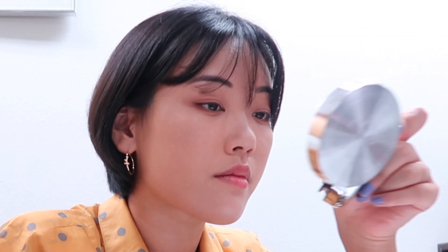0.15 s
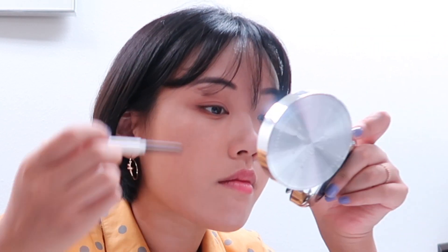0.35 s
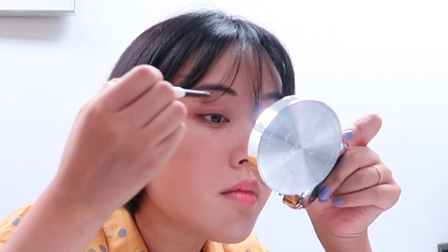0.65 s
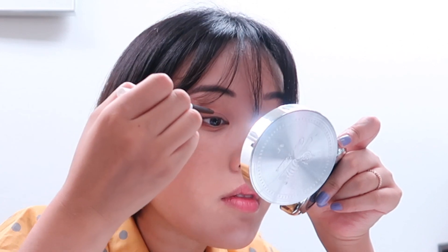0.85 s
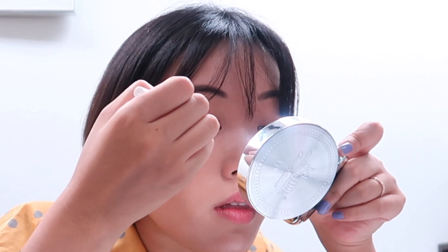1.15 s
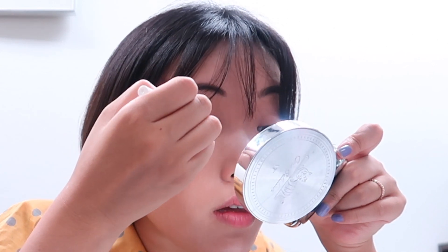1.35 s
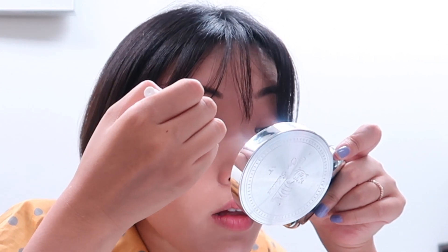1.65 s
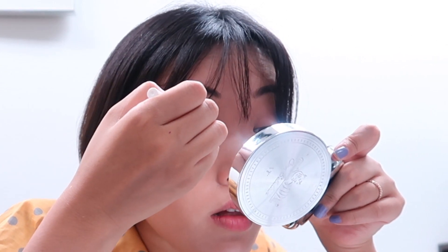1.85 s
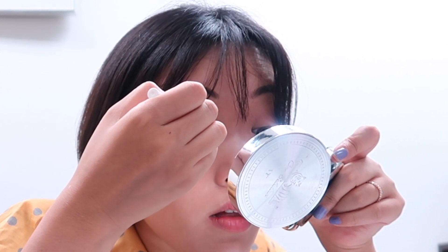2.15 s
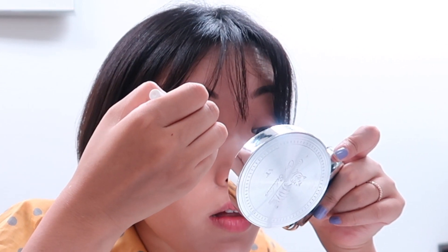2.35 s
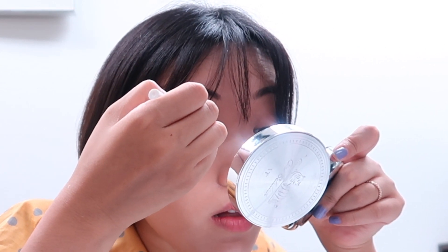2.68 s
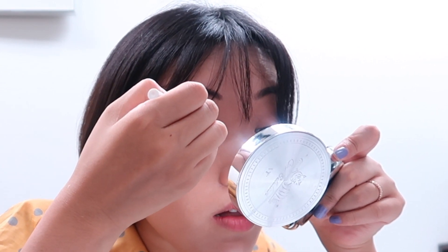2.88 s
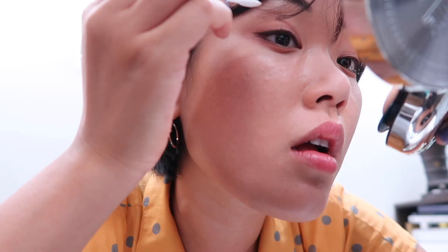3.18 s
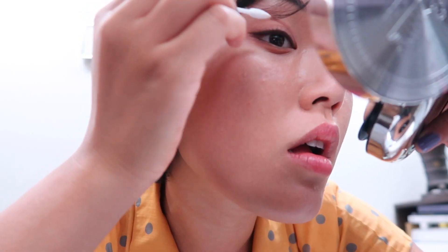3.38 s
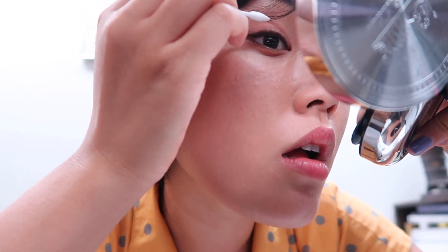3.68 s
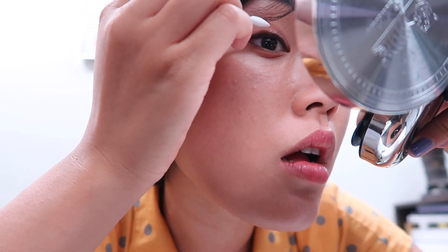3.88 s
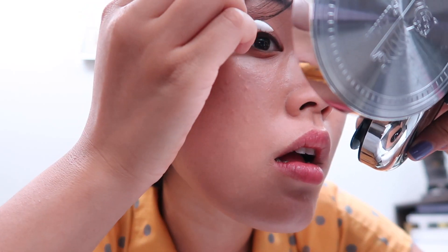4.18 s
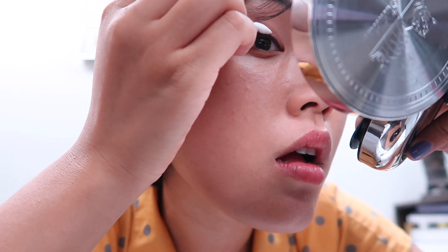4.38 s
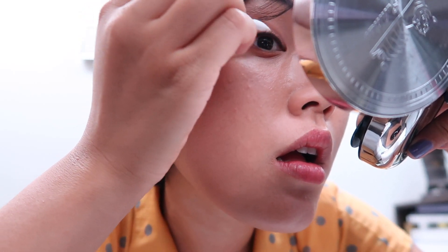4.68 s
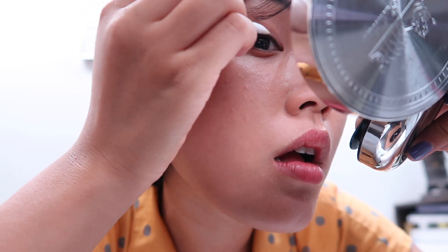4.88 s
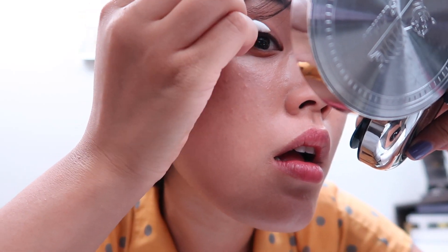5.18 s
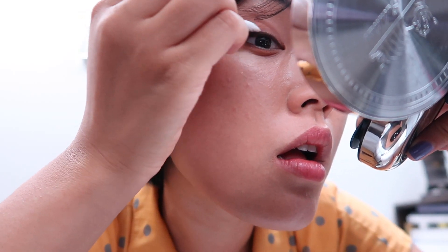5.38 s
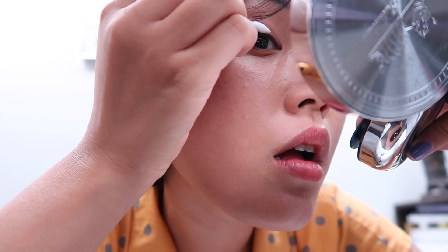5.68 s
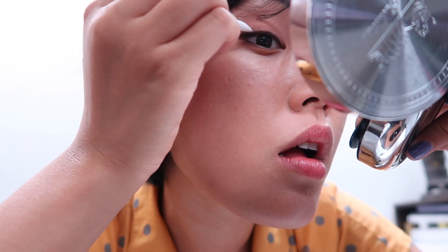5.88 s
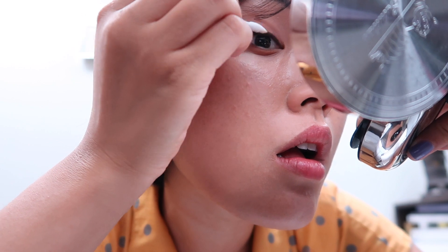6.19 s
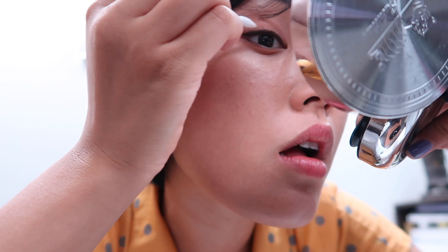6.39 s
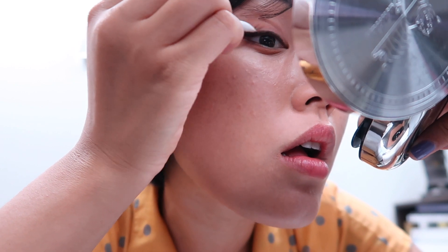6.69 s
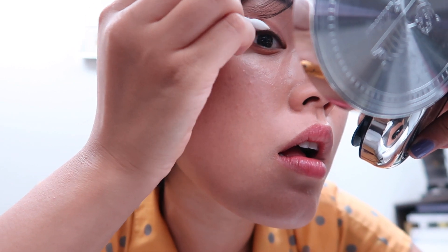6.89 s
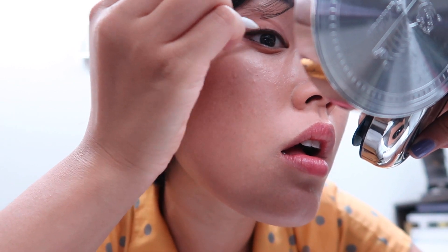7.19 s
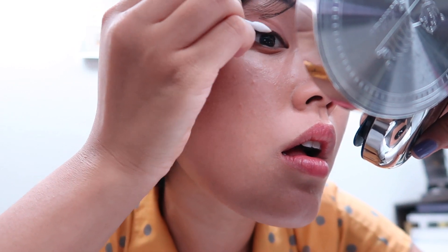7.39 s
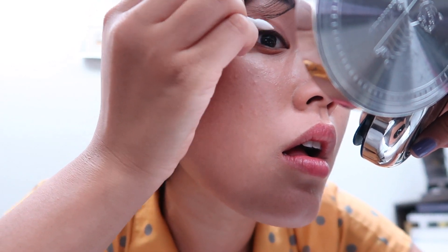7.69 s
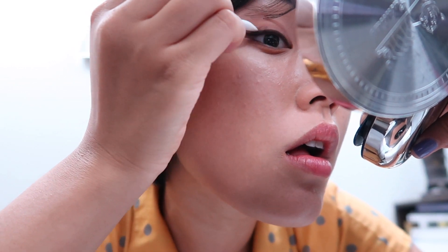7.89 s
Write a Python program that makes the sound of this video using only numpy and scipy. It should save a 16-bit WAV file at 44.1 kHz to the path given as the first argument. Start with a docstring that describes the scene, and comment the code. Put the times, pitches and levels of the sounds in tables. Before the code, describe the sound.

Close stereo microphone in a small, fairly dry room. A low, uneven air-conditioner hum runs throughout. It opens with a brief grainy scuff that dies fast. Faint rubs follow around one second, then a hard object is put down with a loud clack-clack and low furniture thump near 2.7 seconds, trailed by small taps and a rub. Afterwards only hum and very faint rapid ticking remain, until a tiny tap at the end.

```python
"""A hard object is put down: rough cracks set object and room ringing (clack-clack), furniture modes thump.
Before it, a grainy noise slide scuffs across the room.
Close by, someone does make-up: band-noise clinks and rubs, and a tiny motor ticking with snaps and short rings.
Behind all this an air conditioner hums: shaped noise, mains tones and an uneven low drone, with air and whines."""
import sys
import numpy as np
from scipy import signal
from scipy.fft import rfft, irfft, next_fast_len
from scipy.io import wavfile
from scipy.ndimage import uniform_filter1d, map_coordinates

SR = 44100
rng = np.random.default_rng(int(sys.argv[2]) if len(sys.argv) > 2 else 0)


def file_out(sig):
    """Save sig as 16-bit WAV at sys.argv[1]."""
    # one column per channel
    cols = np.atleast_2d(sig).T
    # limit, then scale
    lim = np.clip(cols, -1, 1)
    pcm = np.round(lim * 32767).astype(np.int16)
    wavfile.write(sys.argv[1], SR, pcm)


N = 354986


def amp(db):
    """Decibels to gain."""
    return 10 ** (np.asarray(db) / 20)


def unit(x):
    """Scale to rms 1."""
    return x / np.sqrt(np.mean(x ** 2) + 1e-20)


def along(points, hz):
    """(Hz, value) points read on a log-frequency axis."""
    f, v = np.transpose(points)
    return np.interp(np.log(hz + 1), np.log(f + 1), v)


def curve(rows):
    """(s, value) rows as one value per sample."""
    return np.interp(np.arange(N) / SR, *np.transpose(rows))


def wobble(rate_hz):
    """Smooth random curve, rate_hz knots a second."""
    knots = rng.standard_normal(int(N * rate_hz / SR) + 4)
    return map_coordinates(knots, [np.arange(N) * rate_hz / SR])


def attack(t, rise_s):
    """Exponential approach to 1."""
    return 1 - np.exp(-t / rise_s)


def decay(t, t60_s):
    """Exponential decay, 60 dB in t60_s."""
    return np.exp(-np.log(1000) * t / t60_s)


def bell(hz, centre_hz, width_hz):
    """Gaussian weight of a narrow resonance."""
    return np.exp(-2 * ((hz - centre_hz) / width_hz) ** 2)


def octave_bell(hz, pitch_hz, octaves):
    """Gaussian weight on a log-frequency axis."""
    return np.exp(-.5 * (np.log2((hz + 1) / pitch_hz) / octaves) ** 2)


def filtered(x, response):
    """x through a response given as a function of frequency."""
    n = x.shape[-1]
    m = next_fast_len(n + SR // 2)
    return irfft(rfft(x, m) * response(np.fft.rfftfreq(m, 1 / SR)), m)[..., :n]


def noise(response):
    """Noise whose amplitude per root Hz follows the response."""
    return filtered(rng.standard_normal(N) * np.sqrt(SR / 2), response)


def rush(spectrum):
    """Noise with a (Hz, dB per Hz) spectrum."""
    return noise(lambda hz: amp(along(spectrum, hz)))


def rippled(spectrum, ripple_db, spacing_hz):
    """Noise with random fine peaks and dips, as wall reflections give one place in a room."""
    knots = rng.standard_normal(SR // 4)

    def response(hz):
        ripple = map_coordinates(knots, [hz / spacing_hz])
        return amp(along(spectrum, hz) + ripple_db * ripple)
    return noise(response)


def ringing(modes, t, scatter_db):
    """Sum of damped modes, balanced a little differently at each blow."""
    total = 0
    for hz, db, t60_s in modes:
        gain = amp(db + rng.normal(0, scatter_db))
        total = total + gain * decay(t, t60_s) * np.sin(2 * np.pi * hz * t)
    return total


def friction(pitch_hz, octaves, rise_s, t60_s, grain_db=3):
    """One brief stroke in one noise band, grainy from uneven grip."""
    t = np.arange(SR // 2) / SR
    unevenness = uniform_filter1d(rng.standard_normal(len(t)), size=160, mode="wrap")
    grip = amp(grain_db * unit(unevenness))
    rough = grip * rng.standard_normal(len(t))
    band = filtered(rough, lambda hz: octave_bell(hz, pitch_hz, octaves))
    return unit(band) * attack(t, rise_s) * decay(t, t60_s)


def stereo(mid, side):
    """Left and right from their common and opposite parts."""
    return np.array([mid + side, mid - side])


# Stereo difference of the close microphone pair. Each row: frequency in Hz, gain of the side part in dB.
PAIR_WIDTH = [(300, -23), (1000, -20), (2000, -14), (4000, -7), (6500, 3), (9000, 6), (12000, 13)]


def widened(mid, across):
    """Two ports hear the pressure gradient across them, a quarter cycle ahead."""
    return stereo(mid, filtered(across, lambda hz: 1j * amp(along(PAIR_WIDTH, hz))))


# Room decay. Each row: frequency in Hz, t60 in s.
ROOM_DECAY = [(200, 0.35), (1000, 0.25), (4000, 0.27), (12000, 0.3)]


def in_room(sound, wet_db):
    """Direct sound plus a fresh diffuse noise tail, at both microphones."""
    hz, t, z = signal.stft(rng.standard_normal((2, SR // 2)), SR, nperseg=256)
    fall = amp(-60 * t / along(ROOM_DECAY, hz)[:, None])
    tails = signal.istft(z * fall, SR, nperseg=256)[1]
    answer = amp(wet_db) * tails / np.linalg.norm(tails[0])
    answer[:, 0] += 1  # direct sound
    return widened(*signal.fftconvolve(sound[None], answer, axes=1))


def add(track, s, sound):
    """Mix a sound into the track at time s."""
    part = track[..., max(round(s * SR), 0):][..., :sound.shape[-1]]
    part += sound[..., :part.shape[-1]]


# Level curve of the low drone, uneven by chance. Each row: time in s, level in dB before trim and flutter.
DRONE_CURVE = [(0.0, -37), (0.06, -29.5), (0.18, -43.0), (0.24, -33.0), (0.35, -28.5), (0.48, -45),
               (0.65, -29.5), (0.78, -37), (1.03, -28.5), (1.16, -41), (1.23, -29.5), (1.44, -56),
               (1.49, -32.5), (1.59, -28.5), (1.7, -35.5), (1.77, -55), (1.85, -41), (1.96, -29.5),
               (2.13, -40), (2.21, -28.5), (2.36, -38), (2.41, -29), (2.49, -33), (2.58, -38), (2.67, -26),
               (2.75, -25), (2.84, -39), (2.92, -25.5), (3.08, -45), (3.15, -28), (3.24, -36), (3.3, -29.5),
               (3.62, -39.5), (3.86, -36), (3.93, -30), (4.1, -36), (4.16, -50), (4.22, -35), (4.3, -58),
               (4.42, -35.5), (4.47, -47), (4.56, -22.5), (4.64, -51), (4.68, -40), (4.86, -29.5),
               (4.96, -39), (5.02, -29.5), (5.13, -37.5), (5.23, -29), (5.47, -42), (5.54, -29),
               (5.6, -45.5), (5.64, -29.5), (5.7, -48), (5.77, -31), (5.83, -51), (5.89, -31.5),
               (5.99, -29), (6.09, -44), (6.16, -34.5), (6.22, -35.5), (6.29, -31), (6.48, -32),
               (6.54, -36), (6.75, -30), (6.97, -43), (7.22, -35), (7.5, -35), (7.61, -27), (7.78, -52),
               (7.93, -40), (8.04, -31)]


def fan(pitch_hz=117.2, wander_hz=3.6, trim_db=-4.2, flutter_db=1.5):
    """A low sine drone follows an uneven level curve while its pitch wanders."""
    phase = 2 * np.pi * np.cumsum(pitch_hz + wander_hz * wobble(14)) / SR
    level_db = curve(DRONE_CURVE) + trim_db + flutter_db * wobble(15)
    return amp(level_db) * np.sqrt(2) * np.sin(phase)


# Machine rumble. Each row: frequency in Hz, density in dB per Hz.
RUMBLE_SPECTRUM = [(6, -88), (18, -57.5), (45, -61), (100, -60.5), (150, -60.5), (195, -64.5), (225, -70),
                   (262, -83.5), (340, -100), (600, -125)]
# Narrow noise drones of fan and room. Each row: centre in Hz, width in Hz, peak density in dB per Hz.
DRONE_BANDS = [(25.4, 3.3, -53.5), (32.7, 5.2, -50.5), (64, 16, -59.5), (111.3, 8.5, -58),
               (171.8, 2.5, -55.5), (188.5, 10, -59.5), (230.3, 5.6, -67), (330.7, 3.8, -72)]
# Mains hum. Each row: frequency in Hz, rms level in dB about which it wavers.
MAINS_HUM = [(120, -48.5), (240, -58.5)]


def air_conditioner(waver_db=0.5, drift_rad=0.27):
    """Rumble, narrow drones, and the fan's uneven drone just under the mains hum."""
    t = np.arange(N) / SR
    drones = noise(lambda hz: sum(amp(db) * bell(hz, centre, width) for centre, width, db in DRONE_BANDS))
    hum = 0
    for hz, db in MAINS_HUM:
        level = amp(db + waver_db * wobble(2.6))
        hum = hum + level * np.sqrt(2) * np.sin(2 * np.pi * hz * t + drift_rad * wobble(2.196))
    return rush(RUMBLE_SPECTRUM) + drones + fan() + hum


# Quick turn from one room tone to another. Each row: time in s, position from first (0) to second (1).
TONE_TURN = [(3.22, 0.08), (3.32, 1)]
# First room tone. Each row: frequency in Hz, density in dB per Hz before ripple and flutter.
FIRST_TONE = [(120, -70.5), (200, -65), (238, -62), (270, -72.5), (315, -84), (420, -79), (580, -77),
              (1050, -84), (1270, -89.5), (1550, -84.5), (2500, -93.5), (5000, -104), (11500, -116),
              (14700, -123)]
# Second room tone. Each row: frequency in Hz, density in dB per Hz before ripple and flutter.
SECOND_TONE = [(170, -100), (225, -73), (265, -82), (450, -75), (540, -77), (580, -80), (660, -79.5),
               (900, -84.5), (1200, -86.5), (1650, -85.5), (2200, -91), (3000, -97.5), (5000, -104),
               (12000, -117), (13800, -138)]
# Air that differs between the two channels. Each row: frequency in Hz, density in dB per Hz.
SIDE_AIR = [(60, -125), (130, -106), (200, -92.5), (280, -86), (450, -86.5), (520, -91.5), (1000, -93.5),
            (3500, -101), (4000, -98), (4500, -103), (7000, -109), (11000, -115), (12500, -112),
            (15000, -126)]


def air(flutter_db=0.63, ripple_db=1.37, spacing_hz=22):
    """Air noise with reflection ripple; one room tone gives way to another at equal power."""
    turn = np.clip(curve(TONE_TURN), 0, 1) * np.pi / 2
    first = np.cos(turn) * rippled(FIRST_TONE, ripple_db, spacing_hz)
    second = np.sin(turn) * rippled(SECOND_TONE, ripple_db, spacing_hz)
    return stereo((first + second) * amp(flutter_db * wobble(5.1)), rush(SIDE_AIR))


# Thin electrical tones. Each row: frequency in Hz, rms level in dB.
WHINE_TONES = [(5520, -81), (13006, -82.5)]


def whine():
    """Faint steady sines, opposite in the two channels."""
    t = np.arange(N) / SR
    tones = sum(amp(db) * np.sqrt(2) * np.sin(2 * np.pi * hz * t) for hz, db in WHINE_TONES)
    return stereo(0, tones)


# Firmer motor steps. Each row: start in s, level in dB.
FIRM_STEPS = [(0.7427, -52.5), (1.543, -51), (3.5465, -56), (3.61, -57), (3.6775, -57), (4.146, -59),
              (4.28, -57), (4.5465, -57), (4.8135, -56), (5.0805, -56), (5.347, -57), (5.6144, -56),
              (5.8805, -56), (6.1475, -56), (6.8865, -55), (7.148, -58), (7.4165, -55), (7.6825, -54)]
# Contacts within each light step. Each row: delay in s, mean level in dB.
LIGHT_CONTACTS = [(0, -65.5), (.019, -67), (.026, -69.5)]
# Motor ring. Each row: frequency in Hz, mean level in dB, t60 in s.
MOTOR_MODES = [(3560, 1.5, .018), (3980, 0, 0.022), (5260, -3.5, 0.022)]


def ticks(first_s=.0075, rate_hz=14.984, rise_s=0.00093, snap_db=0, scatter_db=3.0, uneven_db=4.0):
    """A tiny motor steps lightly and evenly, with firmer steps; each contact is a dry snap and brief ring."""
    track, t = np.zeros(N), np.arange(SR // 25) / SR
    snaps = [friction(4300, octaves=0.32, rise_s=rise_s, t60_s=0.017)[:len(t)] for _ in range(20)]
    contacts = list(FIRM_STEPS)
    for step_s in np.arange(first_s, N / SR, 1 / rate_hz):
        for delay_s, db in LIGHT_CONTACTS:
            contacts.append((step_s + delay_s, db + rng.normal(0, uneven_db)))
    for s, db in contacts:
        ring = attack(t, rise_s) * ringing(MOTOR_MODES, t, scatter_db)
        snap = amp(snap_db) * snaps[rng.integers(len(snaps))]
        add(track, s, amp(db) * (snap + ring))
    return stereo(track, 0)


# Taps of pencil and fingernails. Each row: start in s, level in dB.
CLINK_TIMES = [(2.8365, -63), (2.8545, -63), (2.9055, -58), (2.986, -71), (7.952, -63)]


def clinks():
    """Light bright taps, all in one narrow high noise band."""
    track = np.zeros((2, N))
    for s, db in CLINK_TIMES:
        tap = friction(8750, octaves=0.35, rise_s=0.0011, t60_s=0.025)
        add(track, s, amp(db) * in_room(tap, wet_db=0.0))
    return track


# Rubs of hand, mirror and sleeve.
# Each row: start in s, level in dB, pitch in Hz, width in octaves, rise in s, t60 in s.
RUB_STROKES = [(1.031, -54, 2030, 0.51, 0.097, 2), (1.17, -56.5, 3400, 0.57, 0.045, 0.5),
               (1.34, -43.5, 3930, 0.25, 0.02, 0.11), (2.903, -36, 1350, 0.62, 0.014, 0.15),
               (2.944, -46.5, 1700, .5, .004, .1), (7.972, -52.5, 6100, 0.3, 0.002, 0.22),
               (2.978, -50.5, 3820, 0.62, 0.007, 0.17), (2.985, -48.5, 800, 1.17, .03, 0.79),
               (3.079, -46, 650, .5, .003, .08), (4.47, -63, 5460, 0.46, .02, 0.33)]


def rubs():
    """Sliding contacts as grainy noise strokes, each with its own pitch and length."""
    track = np.zeros((2, N))
    for s, db, *stroke in RUB_STROKES:
        add(track, s, amp(db) * in_room(friction(*stroke), wet_db=-2.5))
    return track


# Broad colour of the slide. Each row: frequency in Hz, relative level in dB.
SLIDE_COLOUR = [(250, -33), (420, -14), (600, -6), (780, -0.5), (1130, -0.5), (1400, -3.5), (1580, -4.5),
                (1780, -4), (2200, -7.5), (2570, -5), (3000, -12), (3450, -15), (4000, -20.5), (6000, -32),
                (9000, -48), (14000, -79)]
# Room resonances heard in the scuff. Each row: centre in Hz, width in Hz, lift in dB.
ROOM_RESONANCES = [(1147, 60, 6), (1375, 40, 5.5), (1730, 60, 3), (2400, 50, 3), (2560, 60, 4),
                   (2980, 50, 7), (3200, 35, 9.5), (4730, 36, 10)]


def scuff(level_db=-26, rise_s=.0045, hold_s=0.016, grain_db=0.5):
    """From time 0, a quick push and short grainy slide, lifted at room resonances, die away, treble faster."""
    t = np.arange(N) / SR
    fall_db_per_s, treble_fall_db_per_s, dull_hz = 143, 194, 3400

    def lift(hz):
        return amp(sum(db * bell(hz, centre, width) for centre, width, db in ROOM_RESONANCES))

    def rub():
        return unit(filtered(rippled(SLIDE_COLOUR, ripple_db=1.5, spacing_hz=13), lift))
    slide = widened(rub(), rub())
    body = filtered(slide, lambda hz: 1 / (1 + (hz / dull_hz) ** 4))
    treble = slide - body
    since_s = np.maximum(t - hold_s, 0)
    fading = body * amp(-fall_db_per_s * since_s) + treble * amp(-treble_fall_db_per_s * since_s)
    return fading * attack(t, rise_s) * amp(level_db + grain_db * wobble(250))


# Blows to the furniture. Each row: start in s, level in dB.
THUMP_TIMES = [(2.6854, -22), (2.713, -26), (2.735, -27.5), (2.76, -21), (2.773, -24), (2.804, -27),
               (2.899, -30)]
# Furniture modes. Each row: frequency in Hz, relative level in dB, t60 in s.
FURNITURE_MODES = [(73, -5, 0.15), (94, -8, 0.16), (114.5, -8, 0.35), (156.5, -3, 0.31),
                   (190.6, -3.5, 0.29), (243, -12, 0.14)]


def thumps(rise_s=0.003):
    """The object's weight shakes the furniture's low modes, at random phases."""
    track, t = np.zeros(N), np.arange(SR // 2) / SR
    for s, db in THUMP_TIMES:
        boom = 0
        for hz, level_db, t60_s in FURNITURE_MODES:
            tone = np.sin(2 * np.pi * (hz * t + rng.random()))
            boom = boom + amp(level_db) * decay(t, t60_s) * tone
        add(track, s, amp(db) * attack(t, rise_s) * boom)
    return track


# Contacts of the hard object.
# Each row: start in s, level in dB, contact t60 in s, favoured pitch in Hz, emphasis there in dB.
KNOCK_CONTACTS = [(2.6605, -39, 0.034, 1800, 4), (2.6633, -30, 0.067, 2700, 3),
                  (2.671, -26.5, 0.045, 850, 9), (2.682, -40, .04, 2000, 7), (2.69, -37.5, 0.027, 4850, 19),
                  (2.693, -35, .05, 900, 3), (2.714, -38, 0.077, 1500, 2), (2.748, -35, .02, 2200, 12),
                  (2.7497, -15.5, 0.023, 2430, 11), (2.753, -30, 0.039, 6000, 7),
                  (2.7575, -21, 0.039, 760, 6.5), (2.773, -27.5, 0.026, 3100, 4),
                  (2.797, -38.5, 0.056, 380, 10), (2.82, -45, .025, 3700, 11)]
# Broad colour of the cracks. Each row: frequency in Hz, relative level in dB.
CRACK_COLOUR = [(150, -6), (330, -1), (440, 2), (540, -2), (660, 5), (780, 3), (960, -0.5), (1150, 4),
                (1310, -4), (1550, -4.5), (1850, -4), (2200, -6.5), (2600, -2.5), (3100, -8), (4000, -10.5),
                (6000, -21), (9000, -26), (14000, -45)]
# Ringing modes of object and room. Each row: frequency in Hz, mean relative level in dB, t60 in s.
RING_MODES = [(325, -7, 0.3), (422, 0, 0.075), (657, -13, .14), (790, -10, 0.12), (902, -4.5, 0.17),
              (1063, -10, 0.16), (1120, 3, 0.065), (1443, -17, 0.13), (1880, -12, 0.08), (1960, -13, .11),
              (2300, -15, 0.1), (2500, -12, 0.08), (2980, -21, .12), (3540, -11, 0.13), (3860, -15, .12),
              (4720, -16, 0.12), (6700, -25, 0.17)]


def knocks(ring_db=-15.5, scatter_db=1, octaves=0.44, rise_s=0.0019):
    """Each contact is a short rough crack that sets object and room ringing, with a diffuse tail on both."""
    track, t = np.zeros((2, N)), np.arange(SR // 2) / SR
    onset = attack(t, rise_s)
    for s, db, contact_t60_s, pitch_hz, focus_db in KNOCK_CONTACTS:
        def colour(hz):
            return amp(along(CRACK_COLOUR, hz) + focus_db * octave_bell(hz, pitch_hz, octaves))
        force = onset * decay(t, contact_t60_s)
        grit = force * filtered(rng.standard_normal(len(t)), colour)
        crack = grit * np.linalg.norm(force) / np.linalg.norm(grit)  # energy set by force alone
        ring = amp(ring_db) * onset * ringing(RING_MODES, t, scatter_db)
        add(track, s, amp(db) * (in_room(crack, wet_db=-2.5) + in_room(ring, wet_db=-5)))
    return track


def scene():
    """The room's background, the close handling, and the object put down."""
    background = air_conditioner() + air() + whine()
    handling = ticks() + clinks() + rubs()
    return background + handling + scuff() + thumps() + knocks()


def record(dry, top_hz=14700):
    """The microphones' output, with nothing at or above top_hz."""
    return filtered(dry, lambda hz: hz < top_hz)


dry = scene()
out = record(dry)
file_out(out)
```